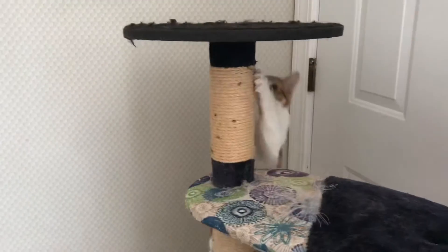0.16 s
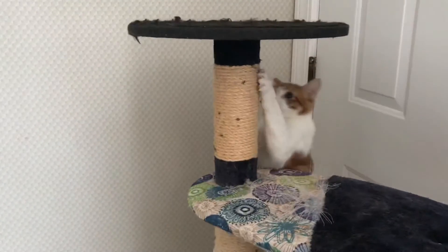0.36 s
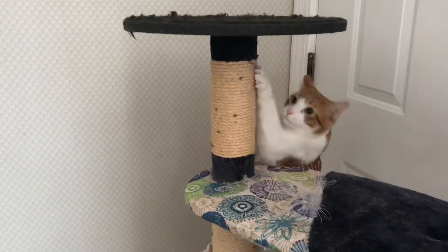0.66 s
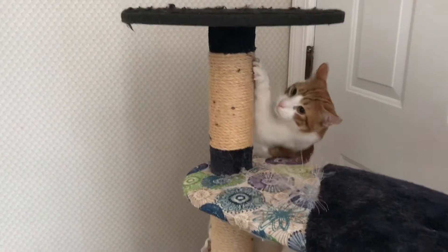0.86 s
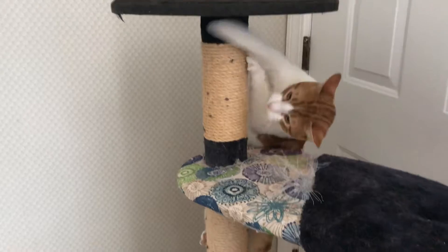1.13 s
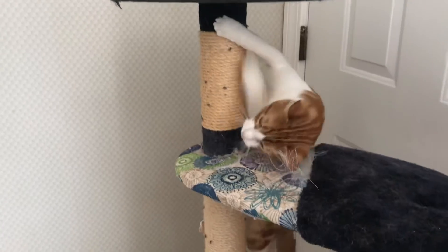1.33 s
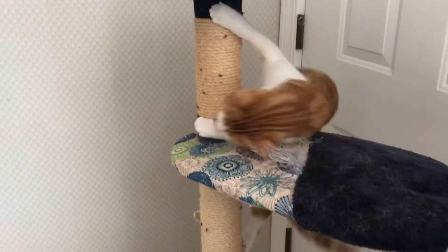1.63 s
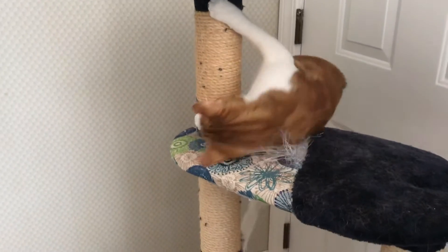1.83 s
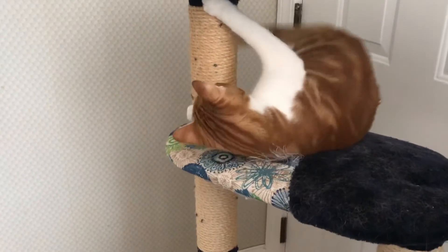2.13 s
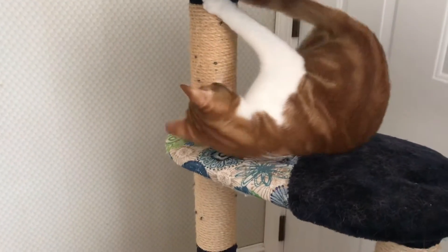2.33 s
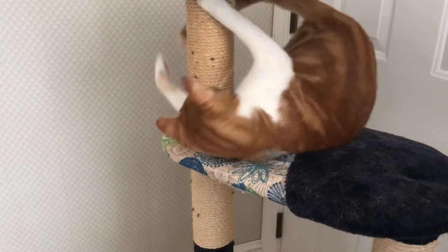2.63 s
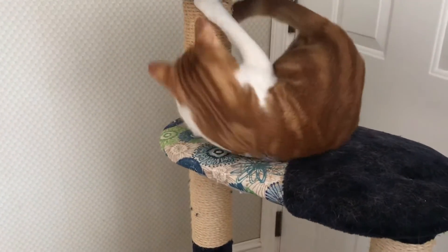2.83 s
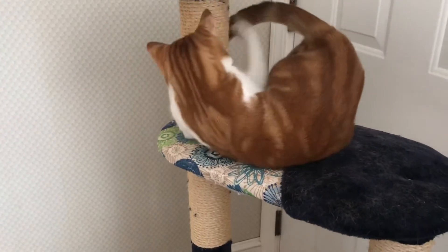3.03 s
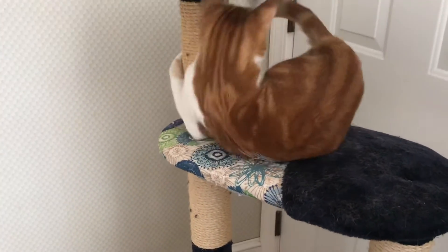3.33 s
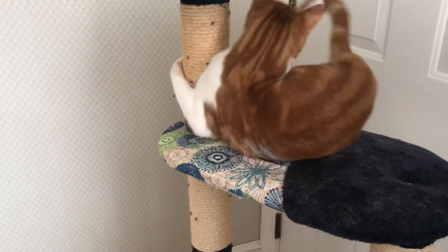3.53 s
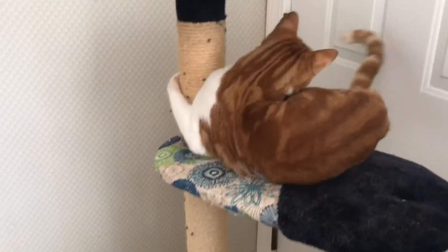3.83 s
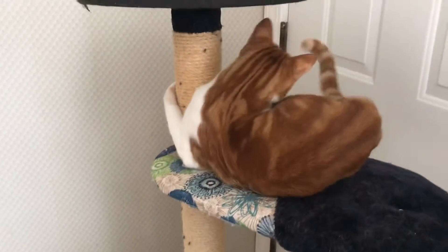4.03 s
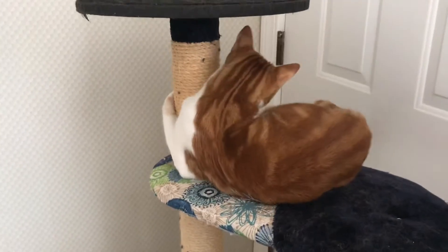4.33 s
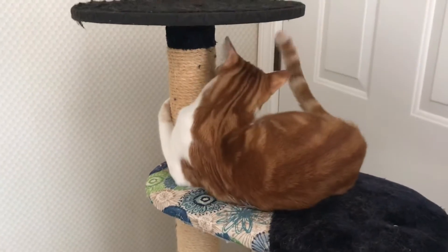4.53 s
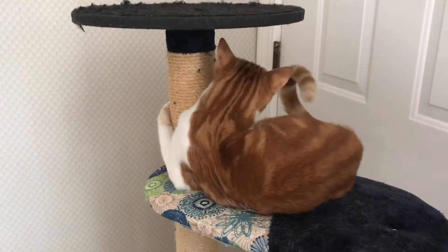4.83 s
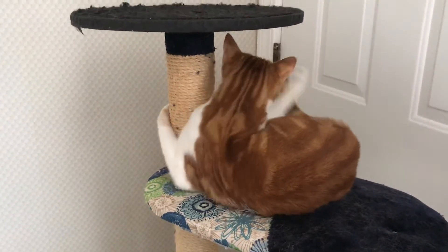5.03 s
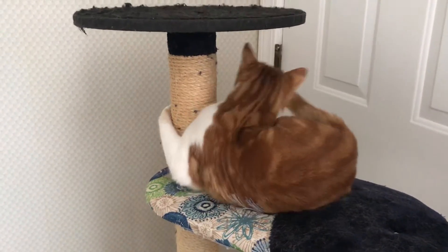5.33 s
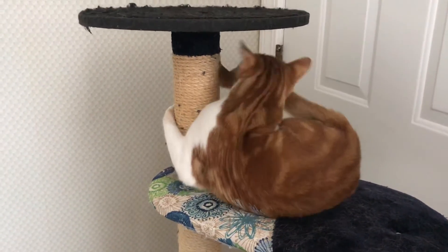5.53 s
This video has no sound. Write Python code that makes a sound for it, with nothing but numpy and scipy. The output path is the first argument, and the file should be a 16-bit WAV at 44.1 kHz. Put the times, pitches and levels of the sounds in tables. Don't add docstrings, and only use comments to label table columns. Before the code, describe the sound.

Indoors on a cat tree, claws rip quickly at coarse rope right at the start, then activity thins out to scattered fibre snaps, cloth snags, padded paw bumps and barely audible rubbing. A long near-quiet stretch with tiny ticks leads to one short hollow wooden rap with a light bounce. Short room echo, faint low room air and steady microphone hiss lie beneath; the cat makes no vocal sound.

```python
import sys
import numpy as np
from scipy import signal
from scipy.fft import rfft, irfft, next_fast_len
from scipy.io import wavfile
from scipy.ndimage import uniform_filter1d

SR = 44100
rng = np.random.default_rng(int(sys.argv[2]) if len(sys.argv) > 2 else 0)


def volts_from_db(level):
    exponent = np.asarray(level, float) / 20
    return 10 ** exponent


def dump(signal):
    limited = np.clip(np.atleast_2d(signal).T, -1, 1)
    pcm = np.round(limited * 32767).astype(np.int16)
    wavfile.write(sys.argv[1], SR, pcm)


N = 249606


def rms_one(x):
    return x / np.sqrt(np.mean(x ** 2) + 1e-20)


def at_hz(points, hz):
    table_hz, value = np.transpose(points)
    return np.interp(np.log(hz + 1), np.log(table_hz), value)


def band(x, low_hz, high_hz):
    return signal.sosfilt(signal.butter(2, [low_hz, high_hz], "band", fs=SR, output="sos"), x)


def ring(push, hz, t60_s):
    radius = volts_from_db(-60 / (t60_s * SR))
    turn = 2 * np.pi * hz / SR
    return signal.lfilter([0, np.sin(turn)], [1, -2 * radius * np.cos(turn), radius ** 2], push + 1e-18)


def add(track, s, piece):
    i = max(round(s * SR), 0)
    track[i:i + len(piece)] += piece[:N - i]


def fibres(shape, spread_db):
    size = np.minimum(rng.exponential(1, shape), 5)
    return rng.standard_normal(shape) * volts_from_db(spread_db * size)


def resonate(x, peaks, direct_db):
    out = volts_from_db(direct_db) * x
    for k, (hz, width_hz, db) in enumerate(peaks):
        radius = np.exp(-np.pi * max(width_hz, 30) / SR)
        poles = [1, -2 * radius * np.cos(2 * np.pi * hz / SR), radius ** 2]
        peak = signal.lfilter([1, 0, -1], poles, x)
        out = out + (-1) ** k * volts_from_db(db) * (1 - radius ** 2) / 2 * peak
    return out


# (t/s, claw level/dB, post body re claw/dB, fibre crackle re claw/dB)
SCRABBLE = [(0.0184, -43.5, 3, 2), (0.0248, -35.5, 0, 6), (0.0304, -51, -5, -34), (0.0667, -41.5, -1, -10),
            (0.0874, -69, -6, -20), (0.1114, -39, -1.5, -18), (0.1171, -30, -3, -46), (0.1294, -37, 6, -49),
            (0.1444, -27.5, -1, -43), (0.1535, -28.5, -1.5, -2), (0.1634, -37, 6, 3.5),
            (0.18, -29, 2.5, -56), (0.1844, -29, 6, -0.5), (0.1884, -49.5, 4, -2), (0.2044, -54, -11, 7),
            (0.2428, -39, 8, -3.5), (0.2484, -51, 8, -27)]
# (t/s, claw level/dB, post body re claw/dB, fibre crackle re claw/dB)
SNAGS = [(0.6639, -49, -1.5, -15), (0.68, -60, 0, -6), (0.8083, -47.5, 1, 0), (0.8155, -57.5, 10.5, -15),
         (0.9491, -40, -7, -21), (0.9524, -42.5, 5.5, -7), (1.1791, -41.5, -12, -8),
         (1.1821, -62, 11.5, -13), (1.302, -40.5, -13, -8), (1.309, -42, 4, -13), (1.3161, -45, -1, -1),
         (1.328, -57, 13, -19), (1.3448, -59, 11, -19), (2.002, -55, 4.5, 1), (2.4762, -65, 10.5, -16),
         (2.7473, -63.5, 15.5, -15), (2.7535, -53.5, 1, -14), (2.8738, -40, -1, 3.5), (2.88, -50, 6, -18),
         (3.177, -47, -1, -6), (3.4635, -51, -3, -21), (3.466, -51, 4.5, -24), (3.484, -58, 3, -20),
         (3.5058, -52, 0, -17), (3.5578, -46, -4, -20), (3.5691, -42.5, -8, -9), (5.417, -57, 9, -1)]
# (t/s, claw level/dB, post body re claw/dB)
TICKS = [(0.394, -54.5, -21), (0.554, -59.5, 3), (0.585, -59, -2), (0.729, -56, -12), (0.7616, -54, -19),
         (0.8954, -58.5, -24), (0.9402, -48, 2), (1.1383, -65, -5), (1.25, -69, -10), (1.877, -52, 5),
         (1.9584, -62, 15), (2.031, -64, -14), (2.1295, -53, -2), (2.5052, -68, -2), (2.589, -59.5, 9),
         (3.37, -62, -9), (1.716, -70, 12), (1.8108, -59, -12), (3.666, -58, -3.5), (3.748, -64, -3),
         (4.32, -66, 3), (4.3944, -69, -4), (4.4694, -66, -8), (4.5196, -66, -12), (4.6184, -66, 1),
         (4.646, -61, 5), (4.69, -61, -9)]
# (f/Hz, width/Hz, level/dB)
POST_MODES = [(547, 22, -11.5), (690, 770, -6.5), (1963, 340, -0.5), (2040, 176, 3), (2350, 17, 0)]
# (f/Hz, width/Hz, level/dB)
CLAW_MODES = [(2330, 160, 6.5), (3460, 1100, 20.5), (4400, 40, -5), (4700, 60, -37), (5640, 130, -32)]
TEAR_MS, TEAR_MS_PER_DB, TEAR_MEAN_DB = 9.4, -0.42, -45
TEAR_RISE_MS = 0.9
CRACKLE_SHARE = 0.31


def claws(events, gain_db, share=1):
    s, claw_db, body_db, crackle_db = np.transpose(events)
    length_ms = share * (TEAR_MS + TEAR_MS_PER_DB * (claw_db - TEAR_MEAN_DB))
    length_s = np.clip(length_ms[:, None] / 1000, 1e-3, 0.04)
    t = np.arange(4096) / SR
    dying = np.exp(-t / length_s) * (1 - np.exp(-1000 * t / TEAR_RISE_MS))
    volley = fibres((len(s), 4096), spread_db=4.0) * dying
    body = resonate(band(volley, 453, 1185), POST_MODES, direct_db=-11.0)
    claw = resonate(band(volley, 1620, 7270), CLAW_MODES, direct_db=11.5)
    snaps = fibres((len(s), 4096), spread_db=7.0) * dying ** (1 / CRACKLE_SHARE)
    crackle = band(snaps, 2470, 13100)
    out = np.zeros(N)
    for part, db in ((body, claw_db + body_db), (claw, claw_db), (crackle, claw_db + crackle_db)):
        loudest = np.sqrt(uniform_filter1d(part ** 2, size=128).max(axis=1))
        gain = volts_from_db(db + gain_db) / loudest
        for start, piece in zip(s, part * gain[:, None]):
            add(out, start, piece)
    return out


# (t/s, peak level/dB, f/Hz)
CLIMB_STRANDS = [(0.0185, -35, 3270), (0.0257, -23, 5640), (0.0307, -29, 2220), (0.0374, -30, 1190),
                 (0.0702, -26, 6590), (0.1184, -17, 6700), (0.1304, -23, 3700), (0.1462, -17, 1980),
                 (0.1544, -15.5, 3530), (0.1646, -15.5, 4300), (0.1813, -13, 3570), (0.1892, -19, 4480),
                 (0.198, -34, 3920), (0.2428, -18.5, 9000)]
# (t/s, peak level/dB, f/Hz)
LATER_STRANDS = [(0.3927, -47, 2820), (0.5567, -48, 7620), (0.6692, -40, 1190), (0.6826, -50, 5770),
                 (0.761, -42.5, 3570), (0.8088, -35, 6700), (0.814, -41, 1640), (0.8218, -51, 2330),
                 (0.8966, -38.5, 2530), (0.9418, -47, 3300), (0.9493, -29, 2060), (0.9529, -34, 2100),
                 (0.966, -45, 2110), (0.979, -46, 2150), (0.987, -42, 2130), (1.1789, -40, 5940),
                 (1.1808, -40, 3940), (1.1847, -38, 3600), (1.19, -37, 2860), (1.197, -45, 3750),
                 (1.2514, -47, 7190), (1.304, -30.5, 1700), (1.3083, -21, 1590), (1.314, -29, 1720),
                 (1.32, -30, 1410), (1.322, -28, 1240), (1.3293, -38, 1720), (1.34, -32, 1420),
                 (1.345, -43, 1210), (1.3525, -41, 1190), (1.3893, -48, 2050), (1.6848, -34, 8200),
                 (1.8135, -36.5, 3920), (1.8779, -43, 1240), (1.96, -41.5, 3060), (2.0042, -39.5, 1780),
                 (2.0084, -46, 1680), (2.026, -45, 6500), (2.033, -50, 7280), (2.1301, -34.5, 5430),
                 (2.1346, -44, 6300), (2.591, -49.5, 1210), (2.7488, -60, 1550), (2.7571, -43, 1320),
                 (2.7626, -39, 2710), (2.8747, -24.5, 9400), (2.895, -41, 4390), (2.9101, -44, 4350),
                 (3.1778, -32, 7000), (3.4676, -37, 1210), (3.4854, -41, 5300), (3.5025, -49, 1380),
                 (3.508, -35, 1250), (3.514, -45, 1550), (3.562, -39.5, 1550), (3.5703, -27, 7300),
                 (3.5973, -48, 1210), (5.4206, -31.5, 1300), (5.4314, -46, 1290), (5.4447, -51, 1260)]
# (t/s, peak level/dB, f/Hz)
MORE_STRANDS = [(0.0885, -41, 7000), (0.1233, -25, 2140), (0.2047, -39, 3820), (0.7294, -52, 7500),
                (0.732, -48, 3400), (1.3022, -25, 7000), (1.316, -34, 8500), (2.8775, -34, 4150),
                (2.882, -30, 4400), (3.4688, -45, 12000), (3.548, -55, 10100), (4.3955, -49, 11000),
                (4.468, -48, 7000), (4.6195, -47, 8500), (4.6464, -47, 1290), (4.651, -58, 1300),
                (4.661, -50, 1400)]
STRAND_CYCLES, STRAND_RATIO, STRAND_DB = 1.6, 1.35, -1


def strands():
    out, t = np.zeros(N), np.arange(1024) / SR
    rows = CLIMB_STRANDS + LATER_STRANDS + MORE_STRANDS
    for (s, db, hz), grit in zip(rows, rng.standard_normal((len(rows), 1024))):
        fading = grit * np.exp(-t * hz / STRAND_CYCLES)
        snap = band(fading, hz / STRAND_RATIO, min(hz * STRAND_RATIO, 0.45 * SR))
        height = np.abs(snap)
        peak_s = height.argmax() / SR
        add(out, s - peak_s, volts_from_db(db + STRAND_DB) * snap / height.max())
    return out


# (t/s, peak level/dB, f where the board answers most/Hz)
KNOCKS = [(0.155, -26, 710), (0.189, -30.5, 710), (0.699, -50.5, 200), (0.947, -45.5, 440),
          (1.303, -31, 1600), (1.313, -30, 840), (1.866, -33, 245), (1.875, -42, 480), (2.474, -51.5, 500),
          (2.593, -45, 347), (2.885, -34.5, 477), (3.152, -61, 500), (3.557, -32.5, 790),
          (3.846, -53.5, 900), (3.890, -50, 930), (3.903, -45, 360), (4.647, -55, 1330), (4.823, -71, 197),
          (5.236, -50.5, 407), (5.247, -47.5, 280)]
# (f/Hz, level/dB, t60/s)
SHELF_MODES = [(174, -2, 0.92), (530, 12, 0.2), (695, 6, 0.035), (1112, 14, 0.58), (1400, -29, 0.99),
               (1980, 22.5, 0.062), (2170, 5, 0.11), (2300, -1, 0.24)]
PAD_HZ, PAD_DAMPING = 500, 0.11
PAD_FALL_DB = 7.5
THUD_DB, THUD_T60_S, THUD_RISE_CYCLES = 1, 0.064, 0.44
PUNCH_DB, PUNCH_CYCLES = -13, 5.1


def paws():
    out, t = np.zeros(N), np.arange(12000) / SR
    mode_shares_db = rng.normal(0, 3.2, (len(KNOCKS), len(SHELF_MODES)))
    puffs = rng.standard_normal((len(KNOCKS), 12000)) * volts_from_db(-60 * t / THUD_T60_S)
    edges = 110 * 2 ** np.arange(0, 4.6, 0.5)
    slices = [band(puffs, low, high) / np.sqrt(low) for low, high in zip(edges, edges[1:])]
    push = t * np.exp(-2 * np.pi * PAD_HZ * t)
    rings = [volts_from_db(level) * ring(push, hz, PAD_DAMPING * t60) for hz, level, t60 in SHELF_MODES]

    def near(hz, pad_hz):
        return volts_from_db(-PAD_FALL_DB * np.log2(hz / pad_hz) ** 2)

    for k, (s, db, pad_hz) in enumerate(KNOCKS):
        modes, thud = np.zeros(len(t)), np.zeros(len(t))
        for mode, ringing, share_db in zip(SHELF_MODES, rings, mode_shares_db[k]):
            modes += volts_from_db(share_db) * near(mode[0], pad_hz) * ringing
        for low, part in zip(edges, slices):
            thud += near(low * 2 ** 0.25, pad_hz) * part[k]
        thud *= 1 - np.exp(-t * pad_hz / THUD_RISE_CYCLES)
        knock = modes / np.abs(modes).max() + volts_from_db(THUD_DB) * thud / np.abs(thud).max()
        punch = -np.sin(2 * np.pi * pad_hz * t) * volts_from_db(PUNCH_DB - 60 * t * pad_hz / PUNCH_CYCLES)
        add(out, s, volts_from_db(db - 2.0) * (knock + punch))
    return out


# (f/Hz, level/dB, t60/s)
TOP_BOARD_MODES = [(478, -3, .08), (540, 0, .05), (640, -6, .05), (900, 0, .045), (1050, -4, .07),
                   (1240, 0, .05), (1480, -8, .05), (2110, -12, .07), (2650, -18, .02)]
RAP_S, RAP_DB, RAP_CONTACT_HZ = 5.4178, -27.5, 1960
BOUNCE_S, BOUNCE_DB = 0.042, -14


def tail_rap():
    out, t = np.zeros(N), np.arange(12000) / SR
    push = t * np.exp(-2 * np.pi * RAP_CONTACT_HZ * t)
    rap = np.zeros(len(t))
    for k, (hz, db, t60) in enumerate(TOP_BOARD_MODES):
        rap += (-1) ** k * volts_from_db(db) * ring(push, hz, t60)
    rap /= np.abs(rap).max()
    add(out, RAP_S, volts_from_db(RAP_DB) * rap)
    add(out, RAP_S + BOUNCE_S, volts_from_db(RAP_DB + BOUNCE_DB) * rap)
    return out


# (t/s, hold/s, level/dB)
STROKES = [
    (0.0, 0.01, -49),
    (0.153, 0.0076, -38.5),
    (0.663, 0.19, -71),
    (0.89, 0.13, -71),
    (1.136, 0.53, -66.5),
    (1.976, 0.057, -60),
    (2.514, 0.3, -69),
    (2.685, 0.044, -78),
    (3.448, 0.49, -69),
    (4.642, 0.019, -68.5),
]
STROKE_ATTACK_DB_PER_S, STROKE_RELEASE_DB_PER_S = 690, 162


def brushing():
    t, level = np.arange(N) / SR, np.zeros(N)
    for s, hold, db in STROKES:
        before = np.maximum(s - t, 0)
        after = np.maximum(t - s - hold, 0)
        level += volts_from_db(db - STROKE_ATTACK_DB_PER_S * before - STROKE_RELEASE_DB_PER_S * after)
    clumps = volts_from_db(0.7 * rms_one(band(rng.standard_normal(N), 30, 200)))
    grains = fibres(N, spread_db=4.5) * clumps
    return level * rms_one(band(grains, 830, 5340) + volts_from_db(-6.5) * band(grains, 3100, 8800))


# (t/s, peak level/dB, f/Hz)
JOLTS = [(0.0, -45, 46.4), (0.012, -46.5, 173), (0.109, -50, 160.7), (0.152, -45, 157.6), (0.04, -45, 54.6),
         (0.19, -37, 53), (0.257, -45.5, 44), (0.966, -56.5, 60), (1.326, -42.5, 54), (1.519, -53, 58),
         (1.878, -41.5, 52.8), (2.769, -54, 49), (2.899, -45.5, 51.3), (3.099, -58.5, 54), (4.81, -64, 58)]
# (t/s, level/dB)
SWAY = [
    (0, -53),
    (0.8, -64.5),
    (1.7, -60.5),
    (2.45, -66.5),
    (3.4, -61.5),
    (4.6, -72),
    (5.66, -62),
]
STAND_T60_S = 0.28


def stand():
    out, t = np.zeros(N), np.arange(SR // 2) / SR
    for s, db, hz in JOLTS:
        swell = (1 - np.exp(-t / 0.0083)) * volts_from_db(db + 10.5 - 60 * t / STAND_T60_S)
        add(out, s, swell * np.sin(2 * np.pi * hz * t))
    out = signal.sosfilt(signal.butter(2, 36, "high", fs=SR, output="sos"), out)
    murmur = band(band(rng.standard_normal(N + SR), 46.6, 55.8), 39, 71.0)[SR:]
    sway_s, sway_db = np.transpose(SWAY)
    return out + volts_from_db(np.interp(np.arange(N) / SR, sway_s, sway_db)) * rms_one(murmur)


# (f/Hz, t60/s)
ROOM_T60 = [(150, 0.68), (500, 0.4), (1500, 0.3), (5000, 0.31), (12000, 0.15)]
ROOM_DB = -10.5


def room(x):
    t = np.arange(SR // 2) / SR
    tail = np.zeros(len(t))
    edges = 90 * 2 ** np.arange(0, 7.6, 0.5)
    for low, high in zip(edges, edges[1:]):
        fading = volts_from_db(-60 * t / at_hz(ROOM_T60, np.sqrt(low * high)))
        tail += band(rng.standard_normal(len(t)), low, high) * fading
    tail *= 1 - np.exp(-t / 0.0052)
    return volts_from_db(ROOM_DB) * signal.fftconvolve(x, tail / np.sqrt(np.sum(tail ** 2)))[:N]


def coloured(spectrum):
    size = next_fast_len(N)
    hz = np.arange(size // 2 + 1) * SR / size
    white = rfft(rng.standard_normal(size))
    return rms_one(irfft(white * volts_from_db(at_hz(spectrum, hz)), size)[:N])


# (f/Hz, level per Hz/dB)
AIR_SPECTRUM = [(41, -39), (70, -2), (91, -15.5), (215, -13.5), (258, -13.5), (356, -15.5), (642, -23),
                (771, -21), (2000, -34), (2600, -36.5), (4400, -120)]
# (f/Hz, level per Hz/dB)
HISS_SPECTRUM = [(900, -12), (1600, 0), (3200, -1.5), (5000, -4.5), (8000, -4.5), (10500, -9),
                 (12500, -7.5), (16300, -9)]
AIR_DB, HISS_DB = -64.5, -72.3


def air():
    unrest = volts_from_db(1.9 * rms_one(band(rng.standard_normal(N), 1.0, 26)))
    return volts_from_db(AIR_DB) * coloured(AIR_SPECTRUM) * unrest + volts_from_db(HISS_DB) * coloured(HISS_SPECTRUM)


def scene():
    light_catches = [(*tick, 2) for tick in TICKS]
    near = claws(SCRABBLE + SNAGS, gain_db=-1)
    near = near + claws(light_catches, gain_db=-5, share=0.45)
    near = near + strands() + paws() + tail_rap() + brushing()
    return (near + room(near) + stand() + air())[None]


def low_pass(x):
    return signal.sosfilt(signal.butter(12, 16530, fs=SR, output="sos"), x)


def record(dry):
    cut = signal.sosfilt(signal.cheby2(12, 60, 16500, fs=SR, output="sos"), dry)
    return low_pass(cut)


dry = scene()
out = record(dry)
dump(out)
```